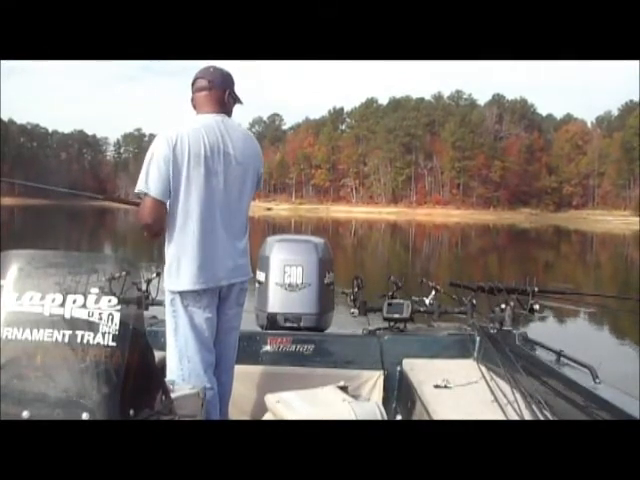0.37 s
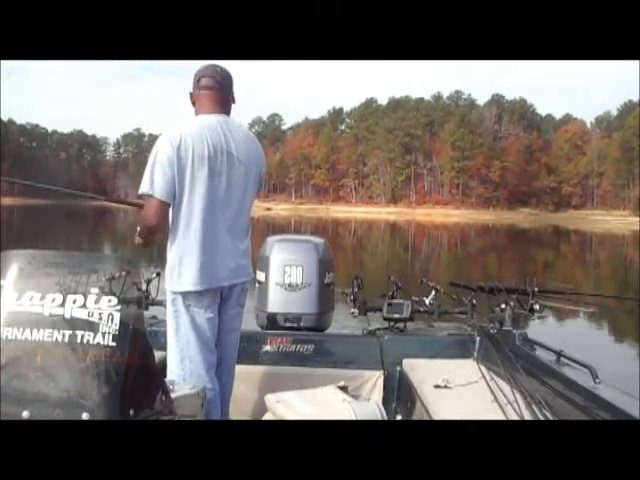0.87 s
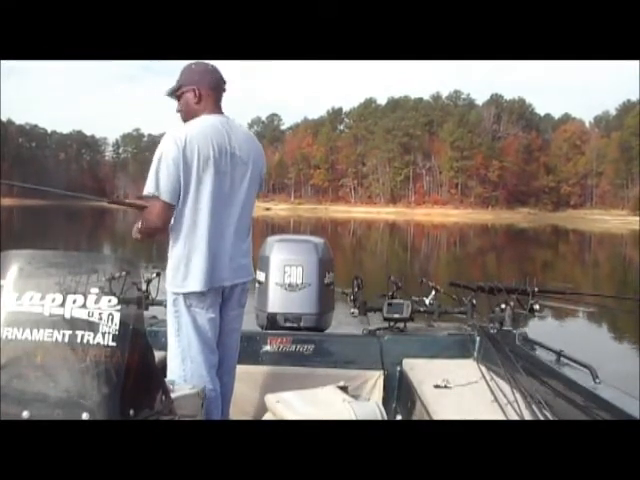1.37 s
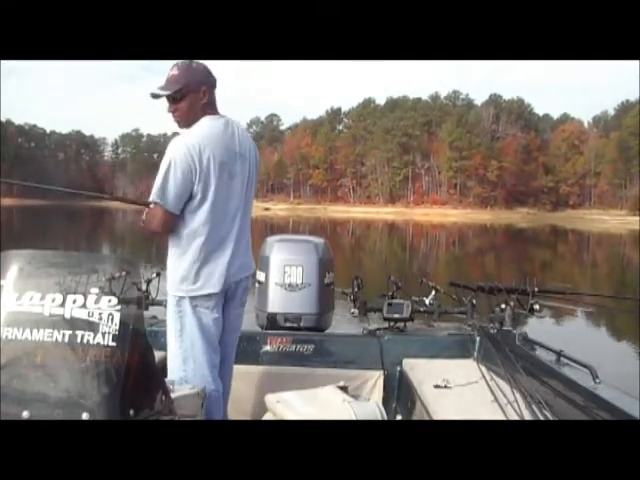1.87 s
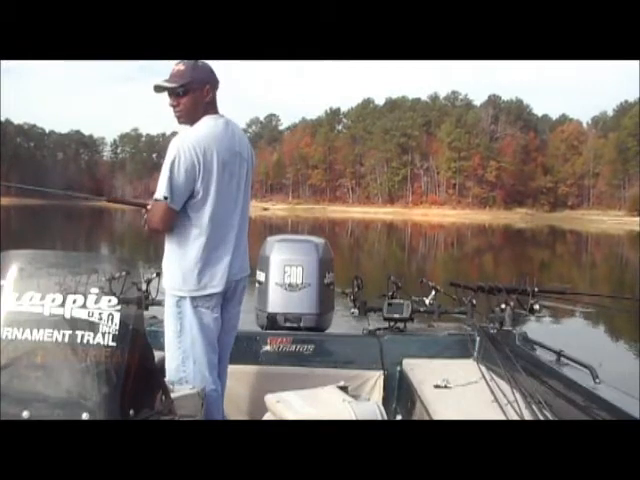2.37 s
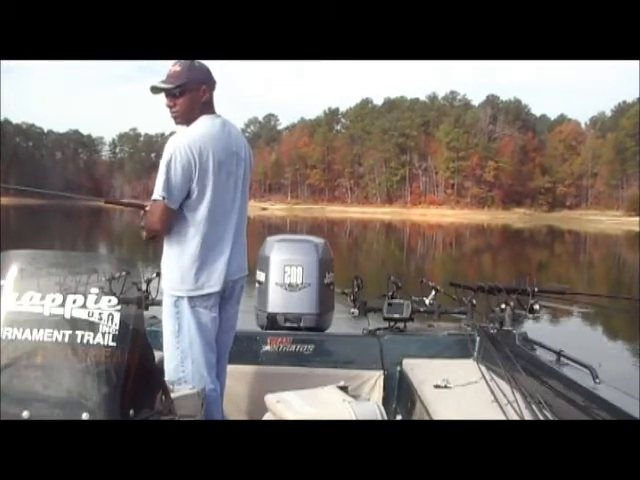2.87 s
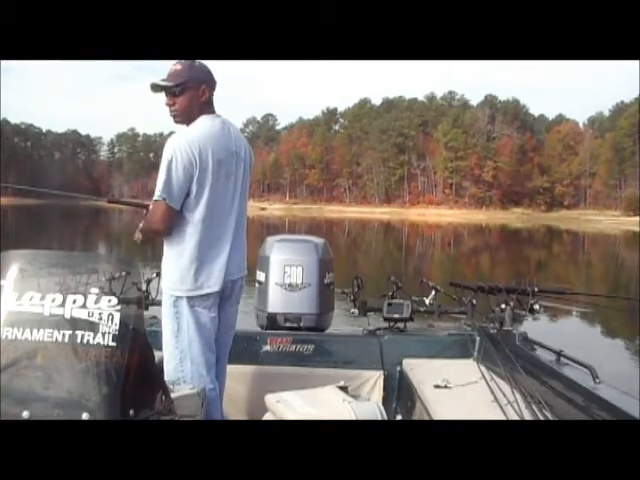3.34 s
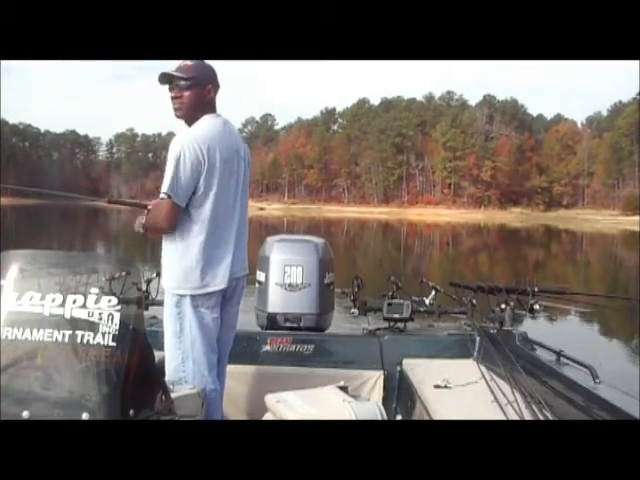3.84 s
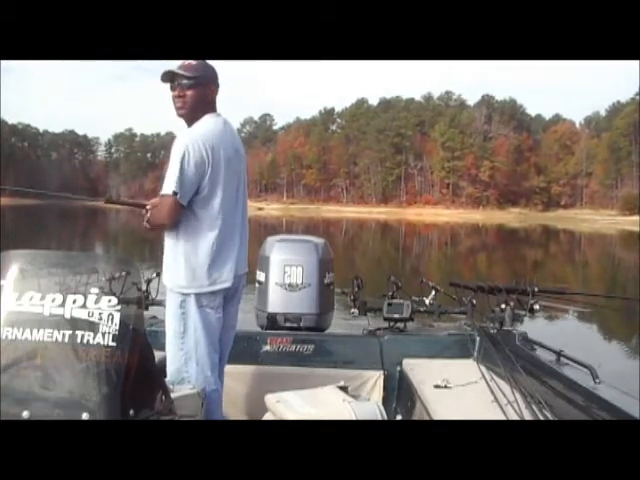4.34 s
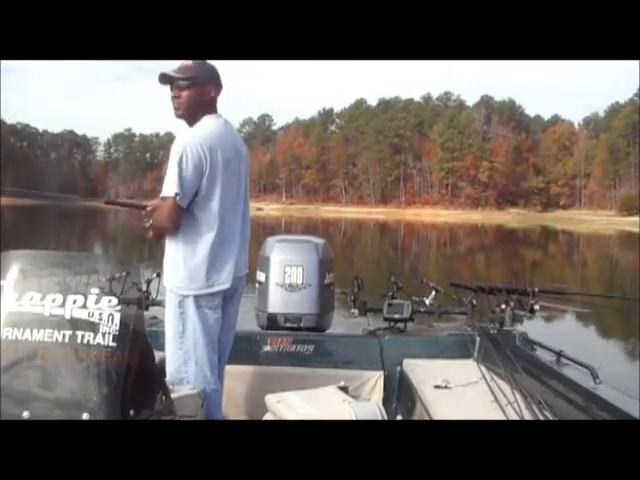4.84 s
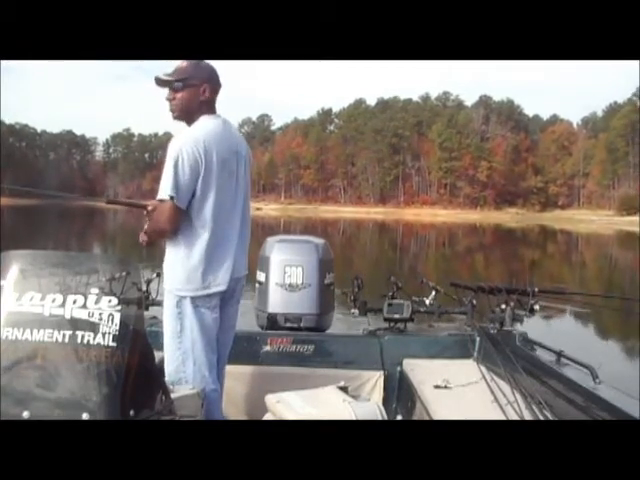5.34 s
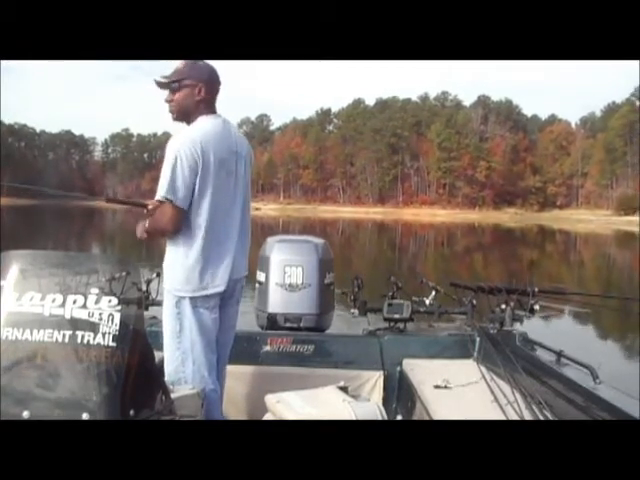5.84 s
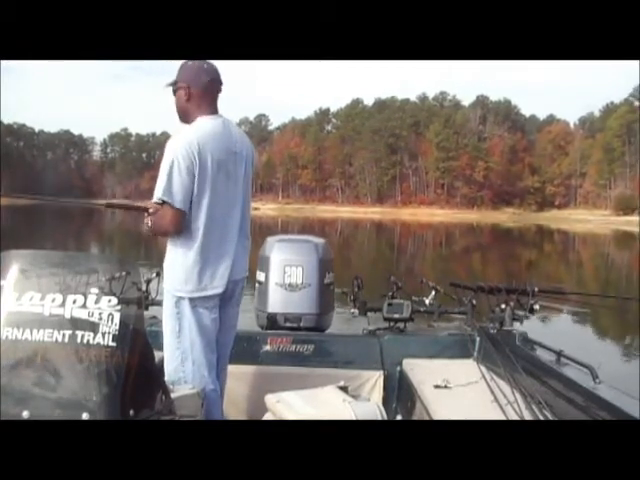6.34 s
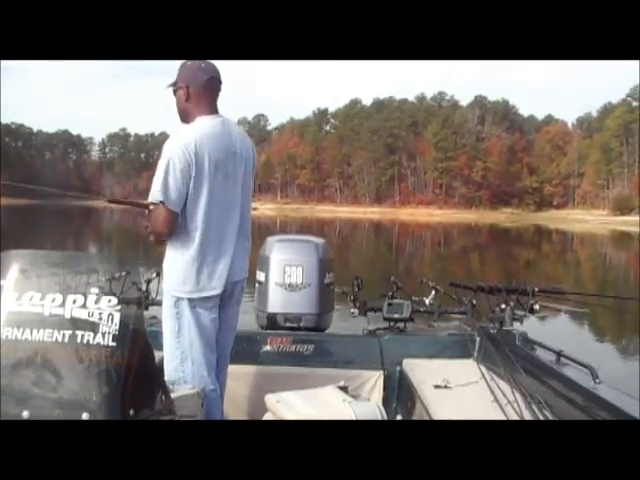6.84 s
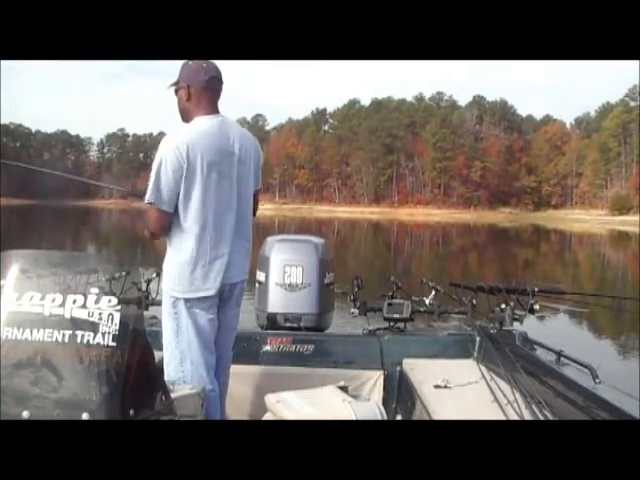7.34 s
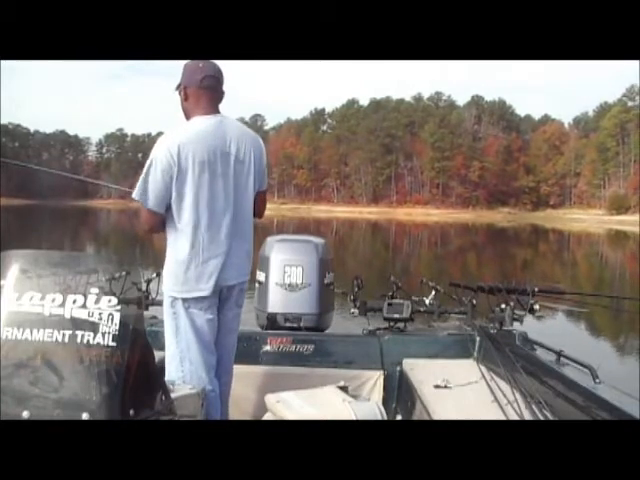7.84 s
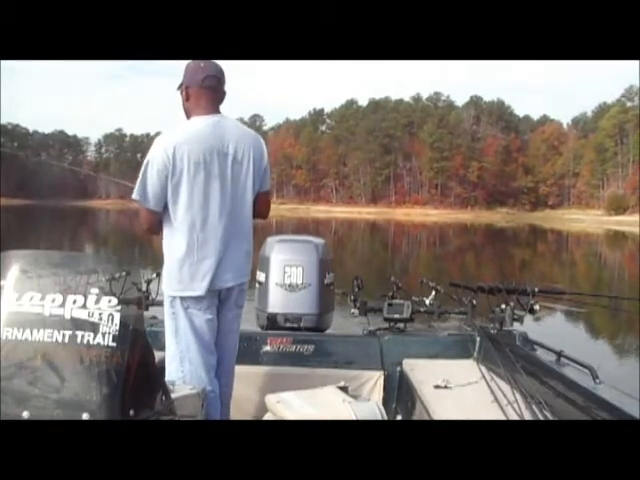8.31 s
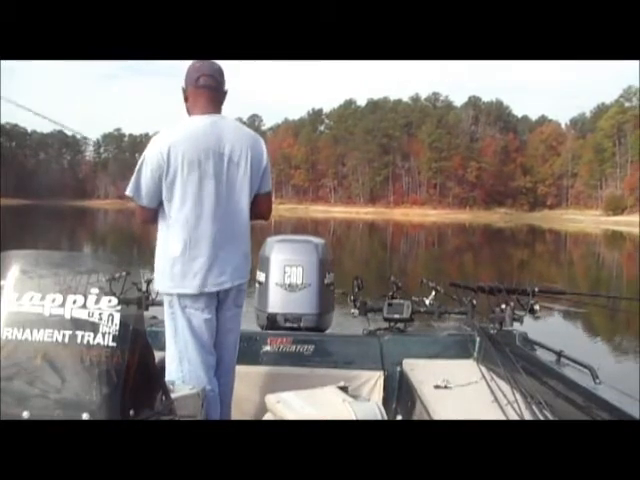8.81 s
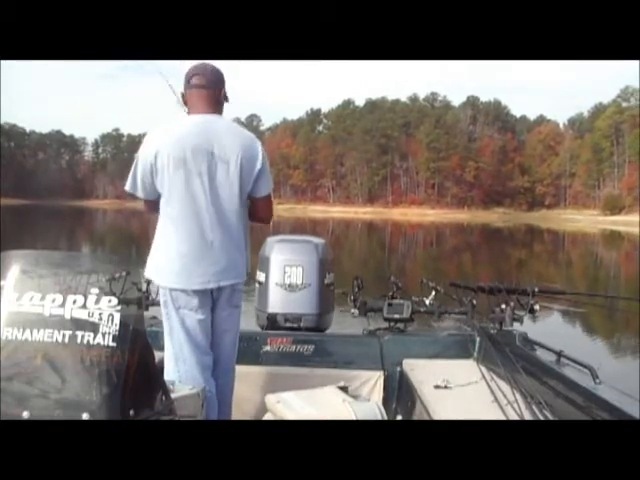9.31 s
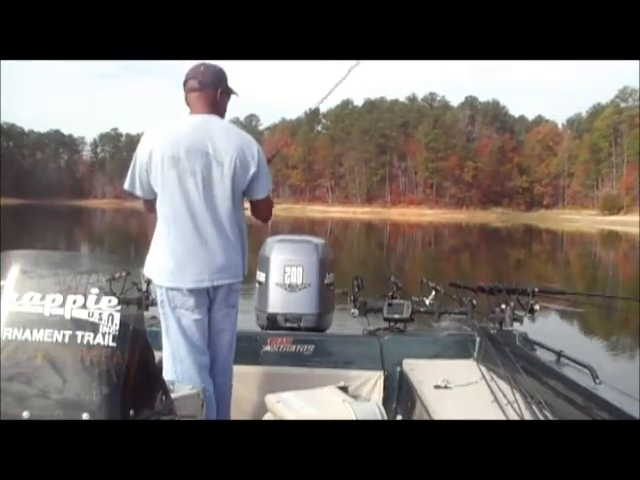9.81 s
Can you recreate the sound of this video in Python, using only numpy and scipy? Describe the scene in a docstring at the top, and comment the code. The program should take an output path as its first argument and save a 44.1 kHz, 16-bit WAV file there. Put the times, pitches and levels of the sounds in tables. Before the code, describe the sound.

Small reel gears whirr quietly for eight seconds, broken by loud hard clacks and line squeaks, with steady boat hum and distant evenly spaced caws.

```python
"""Cranked spinning reel on a moored boat

Gear noise swells with each rotor turn until cranking stops; noise blows ring the reel as the spool clacks at
the end of its stroke, parts tick and a last soft scrape rattles; swept harmonic tones make the line squeak.
Steady sines make the hull's pump motor hum, with two sidebands, and two high electronic whines; pulsed noise
is a faint insect, patchy noise the rumble and air. A hoarse harmonic voice is a far crow, echoed by the
wooded shore; a sliding sine is a small bird."""
import sys
import numpy as np
from scipy import signal
from scipy.fft import rfft, irfft, next_fast_len
from scipy.io import wavfile
from scipy.ndimage import uniform_filter1d, map_coordinates

SR = 44100
rng = np.random.default_rng(int(sys.argv[2]) if len(sys.argv) > 2 else 0)


def undo_db(level):
    """Turn decibels back into plain size, where 20 dB means ten times bigger."""
    steps = np.asarray(level, float) / 20
    return 10 ** steps


def transcribe(u):
    """Save the signal u as a 16-bit wav file named by the first command-line argument.

    u: samples, shape (n,) or (channels, n), limited to [-1, 1]; the rate is SR.
    q: integer samples, one column per channel.
    """
    v = np.clip(np.atleast_2d(u).T, -1, 1)
    q = np.round(v * 32767).astype(np.int16)
    wavfile.write(sys.argv[1], SR, q)


N = 438354
T = np.arange(N) / SR


def unit(x):
    """Scaled to rms 1."""
    return x / np.sqrt(np.mean(x ** 2) + 1e-20)


def along(points, hz):
    """Interpolates (hz, value) points on a log frequency axis."""
    point_hz, value = np.transpose(points)
    return np.interp(np.log(hz + 1), np.log(point_hz + 1), value)


def wobble(rate_hz):
    """Smooth random curve with rate_hz knots a second."""
    knots = rng.standard_normal(int(N * rate_hz / SR) + 4)
    return map_coordinates(knots, [T * rate_hz])


def filtered(x, response):
    """x times a complex response of frequency."""
    size = next_fast_len(x.shape[-1] + 8192)
    spectrum = rfft(x, size) * response(np.fft.rfftfreq(size, 1 / SR))
    return irfft(spectrum, size)[..., :x.shape[-1]]


def resonance(f, hz, width_hz):
    """One causal resonance of gain 1."""
    return 1j * f * width_hz / (hz * hz - f * f + 1j * f * width_hz)


def modes(f, table):
    """Causal sum of (hz, width_hz, gain_db) resonances with alternating signs."""
    return sum((-1) ** k * undo_db(db) * resonance(f, hz, width_hz) for k, (hz, width_hz, db) in enumerate(table))


def ports(x, lead_s):
    """Stereo pair of a sound from one side: the left microphone leads by lead_s."""
    side = np.array([[1], [-1]])
    return filtered(x, lambda f: np.exp(1j * np.pi * f * lead_s * side))


def rush(gain, alike, patchy_db):
    """Stereo noise of rms 1 with time-frequency patches of random gain."""
    z = signal.stft(rng.standard_normal((2, N)), nperseg=256)[2]
    field = uniform_filter1d(rng.standard_normal(z.shape[1:]), size=3, axis=0)
    field = uniform_filter1d(field, size=5, axis=1)
    pair = signal.istft(z * undo_db(patchy_db * unit(field)), nperseg=256)[1][:, :N]

    def mid_side_gain(f):
        turn = np.arccos(np.clip(along(alike, f), -1, 1)) / 2
        return gain(f) * np.array([np.cos(turn), np.sin(turn)])

    mid, side = filtered(pair, mid_side_gain)
    return unit(np.array([mid + side, mid - side]))


def echo(x, t60s, length_s):
    """Diffuse stereo tail; each frequency decays at its own speed."""
    hz, t, z = signal.stft(rng.standard_normal((2, round(length_s * SR))), SR, nperseg=128)
    decay = undo_db(-60 * t / along(t60s, hz)[:, None])
    tail = signal.istft(z * decay, SR, nperseg=128)[1]
    return signal.fftconvolve(x[None], tail / np.linalg.norm(tail[0]), axes=1)


def add(out, start_s, x):
    """Mixes x into out from start_s on."""
    part = out[..., round(start_s * SR):][..., :x.shape[-1]]
    part += x[..., :part.shape[-1]]


# reel body resonances: (pitch_hz, width_hz, gain_db)
REEL_BODY = [(2253, 630, -1), (3440, 1770, -2), (4500, 1580, -3.5), (6420, 1200, -7.5), (8060, 2900, -10.5),
             (10230, 1800, -7), (12300, 1200, -5), (14280, 500, -14)]


def body(f):
    """The reel's resonances; so small a thing radiates no bass."""
    return modes(f, REEL_BODY) * (1j * f / (1200 + 1j * f)) ** 2


# gear wheel ringing: (pitch_hz, relative_level_db)
GEAR_MODES = [(2580, -16), (3490, -2), (4400, -9), (6650, -0.5), (7600, -3), (10700, 1), (12400, -7)]


def pings(load_db, count):
    """Single teeth catch, louder under load, and each briefly rings one gear mode."""
    luck, t = rng.random((count, 4)), np.arange(SR // 40) / SR
    hz, db = np.array(GEAR_MODES)[(luck[:, 0] * len(GEAR_MODES)).astype(int)].T
    at = (luck[:, 1] * N).astype(int)
    size = undo_db(db + 1.1 * load_db[at] - 1.8 * np.log(luck[:, 2]))
    detuned_hz = hz * (1 + 0.075 * (luck[:, 3] - .5))
    ring = np.sin(2 * np.pi * detuned_hz[:, None] * t)
    ring *= undo_db(-60 * t * hz[:, None] / 130)  # 60 dB in 130 cycles
    ring *= 1 - np.exp(-t / 0.00024)
    samples = at[:, None] + np.arange(len(t))
    out = np.bincount(samples.ravel(), (size[:, None] * ring).ravel())
    return unit(out[:N])


# rotor, speeding up and slowing with the hand: (time_s, turns_made)
ROTOR_TURNS = [(0.0, 0.5), (1.2, 22.29), (1.6, 29.8), (2.6, 47.99), (3.0, 55.7), (3.4, 63.59), (3.8, 71.07),
               (4.4, 81.92), (4.6, 85.37), (5.6, 103.7), (6.2, 114.99), (6.6, 122.11), (6.8, 125.2),
               (7.4, 135.7), (8.4, 152.61)]
# gear whirr, easing off until the hand stops: (time_s, level_db)
WHIRR_LEVEL = [(0.0, -54), (1.3, -52.5), (2.1, -54), (2.6, -53), (5.5, -54), (6.0, -52.5), (6.8, -55.5),
               (8.04, -56), (8.23, -61.5), (8.3, -87)]


def gears():
    """The mesh grinds hardest at one spot of each rotor turn and a little at the opposite one."""
    angle = 2 * np.pi * np.interp(T, *np.transpose(ROTOR_TURNS))
    load_db = (1.35 + .5 * wobble(6.46)) * np.cos(angle)
    load_db += (1.5 + .5 * wobble(6.7)) * np.cos(2 * angle)
    load_db += 0.82 * wobble(30)

    def grind_gain(f):
        tilt = undo_db(0.36 * np.log2(f / 4000 + .01))
        return abs(body(f)) * tilt / (1 + (f / 15100) ** 90)

    alike = [(2500, 1.0), (7000, 0.82), (14000, 0.6)]  # (hz, left-right likeness)
    grind = rush(grind_gain, alike, patchy_db=3.0)
    teeth = ports(pings(load_db, count=1500), 6e-6)
    time_s, level_db = np.transpose(WHIRR_LEVEL)
    level = undo_db(np.interp(T, time_s, level_db, right=-120))
    return level * unit(undo_db(load_db) * grind + undo_db(-5.5) * teeth)


# pump motor tones: (pitch_hz, level_db, waver_db)
PUMP_TONES = [(33.5, -86, 1), (86.4, -66.5, 3), (171.4, -55, 1.5), (263.7, -70.5, 3), (293, -69.5, 2.5),
              (346.4, -69, -1.5), (839, -58.5, .5), (1208, -78.5, 5)]


def pump():
    """Motor tones wavering slightly in level and phase, a little out of step at the two microphones."""
    out = np.zeros((2, N))
    for hz, level_db, waver_db in PUMP_TONES:
        level = undo_db(level_db + waver_db * wobble(25))
        phase = 2 * np.pi * hz * T + 0.22 * waver_db * wobble(8) + [[.3], [-.3]]
        out += np.sqrt(2) * level * np.sin(phase)
    return out


# two sidebands of the 839 Hz motor tone, then two high electronic whines: pitch_hz
THIN_TONES_HZ = [769, 909, 6659, 9076]


def thin_tones():
    """Thin steady tones: two sidebands of the 839 Hz motor tone, two high electronic whines."""
    levels_db = [-79.5, -75.5, -84, -84.5]
    return np.sqrt(2) * sum(undo_db(db) * np.sin(2 * np.pi * hz * T) for hz, db in zip(THIN_TONES_HZ, levels_db))


def insect():
    """A band of buzz pulsed about sixty times a second, unevenly, strongest at its lower edge."""
    at = np.arange(0, N, SR / 60.3).astype(int)
    clicks = np.zeros(N)
    clicks[at] = undo_db(3 * rng.standard_normal(len(at)) + 1.1 * wobble(3.5)[at])
    pulses = 0.24 + signal.fftconvolve(clicks, np.hanning(160))[:N]
    bursts = pulses * rng.standard_normal((2, N))
    bursts += 0.71 * bursts.mean(axis=0)

    def band(f):
        return (1 + 2.0 * abs(resonance(f, 5300, 250))) / (1 + ((f - 5950) / 900) ** 8)

    return undo_db(-68.0) * unit(filtered(bursts, band))


# hull rumble and far air: (pitch_hz, relative_density_db_per_hz)
AIR_SPECTRUM = [(15, -51), (30, -7), (48, -15.5), (70, -3), (120, -7), (217, -8.5), (363, -7.5), (714, -15),
                (988, -18), (1520, -19.5), (2600, -23), (4740, -29.5), (7310, -31.5), (10500, -35),
                (13000, -42), (15200, -41), (15300, -90)]
# the same: (pitch_hz, left_right_likeness)
AIR_ALIKE = [(60, 0.79), (150, 0.89), (300, 0.41), (700, 0.29), (1400, 0.32), (5000, 0.16)]


def rumble_and_air():
    """Hull rumble and far air as one shaped, patchy stereo noise."""
    return undo_db(-54.5) * rush(lambda f: undo_db(along(AIR_SPECTRUM, f)), AIR_ALIKE, patchy_db=1.0)


# deck answer: (pitch_hz, t60_s)
DECK_T60 = [(1000, 0.38), (3000, 0.24), (12000, 0.013)]


def deck(x, length_s):
    """The deck answers with a short diffuse tail, cut to the length of x."""
    return echo(x, DECK_T60, length_s)[:, :len(x)]


# short line squeaks: (start_s, length_s, first_pitch_hz, last_pitch_hz, level_db)
SHORT_SQUEAKS = [(0.4044, .013, 4960, 5850, -31.5), (.6765, .018, 5600, 5100, -36),
                 (1.264, .009, 5730, 5860, -41), (7.2705, 0.011, 5150, 4550, -45)]
# one long squeal of the line: (time_s, pitch_hz, level_db)
LONG_SQUEAL = [(6.931, 5300, -50.5), (6.935, 4350, -30), (6.944, 4320, -38.5), (6.947, 4600, -33),
               (6.957, 5020, -35), (6.97, 4780, -34), (6.986, 4670, -40), (6.99, 4580, -34),
               (6.996, 4730, -42), (7.004, 4500, -40), (7.022, 4550, -58)]
SLIP_SHARE, FADE_DB = 0.55, 18  # share of a short squeak at full strength, fall over the rest
OCTAVE_DB, FLUTTER_DB = -11.5, 1.6


def squeaks():
    """Stick-slip of the line: a rough, fluttering tone with its octave and twelfth."""
    out = np.zeros((2, N))
    curves = []
    for start_s, length_s, first_hz, last_hz, db in SHORT_SQUEAKS:
        slip_end = (start_s + SLIP_SHARE * length_s, last_hz, db)
        curves.append([(start_s, first_hz, db), slip_end, (start_s + length_s, last_hz, db - FADE_DB)])
    for rows in curves + [LONG_SQUEAL]:
        time_s, pitch_hz, level_db = np.transpose(rows)
        t = np.arange(time_s[0], time_s[-1], 1 / SR)
        hz, db = np.interp(t, time_s, pitch_hz), np.interp(t, time_s, level_db)
        rough_hz = hz * (1 + 0.014 * wobble(920)[:len(t)])
        phase = 2 * np.pi * np.cumsum(rough_hz) / SR
        overtones = np.sin(2 * phase) + undo_db(-10.5) * np.sin(3 * phase)
        tone = np.sin(phase) + undo_db(OCTAVE_DB + 3 * wobble(180)[:len(t)]) * overtones
        level = undo_db(db + FLUTTER_DB * wobble(260)[:len(t)])
        x = np.sqrt(2) * tone * level * signal.windows.tukey(len(t), .15)
        add(out, time_s[0], x * undo_db([[-1.5], [1.5]]) + undo_db(-6.5) * deck(x, 0.087))
    return out


# spool and rod handle under a blow: (pitch_hz, width_hz, gain_db)
KNOCK_MODES = [(670, 68, -14.5), (908, 41, -11), (1280, 160, -12.5), (1533, 74, -15.5), (2500, 79, -4.5),
               (2718, 42, 7), (2870, 110, -1.5)]
# spool clacks at the end of its stroke; the last row is a soft, rattling scrape:
# (start_s, peak_db, rattle_db)
CLACKS_AND_SCRAPE = [(.9146, -11.5, -10.5), (2.599, -9, -8), (4.241, -12, 1), (5.9382, -12, -1.5),
                     (7.417, -13.5, -5), (7.7051, -17, 2), (8.192, -31.5, 14)]
CLACK_T60_S, CLACK_BRIGHT_DB_PER_OCTAVE = 0.056, 7
# small ticks, with the spool's rebound one rotor turn after the first and third clacks (0.9654 s, 4.2944 s):
# (start_s, peak_db, rattle_db, bright_db_per_octave)
PART_TICKS = [(.442, -37, -10, 9), (0.507, -38, -18, 2), (.9654, -37, -4, 11), (4.2944, -37, -2, 7),
              (4.527, -39, 6, 10), (4.686, -39, -8, 17), (7.0738, -40, -18, 16), (7.1324, -30, -12, 19),
              (7.194, -37, -18, 18), (7.199, -25.5, -15, 19), (7.2408, -38, -18, 13),
              (7.2448, -28, -12, 26), (7.4833, -23, -22, 11.5), (7.638, -38, -6, 10), (8.02, -42, 4, -3),
              (8.05, -43, 4, -3), (8.094, -37, -8, 7), (8.3619, -52, -8, -5), (8.4935, -49, -6, 7),
              (9.3045, -40, 3, 9)]
TICK_T60_S = 0.055


def blows():
    """A sharp contact, a rebound, then a rattle, which outweighs the contact in the scrape; body and deck ring."""
    out, t = np.zeros((2, N)), np.arange(SR // 8) / SR
    rows = [(*clack, CLACK_BRIGHT_DB_PER_OCTAVE, CLACK_T60_S) for clack in CLACKS_AND_SCRAPE]
    rows += [(*tick, TICK_T60_S) for tick in PART_TICKS]
    for start_s, peak_db, rattle_db, bright_db, t60_s in rows:
        crack = undo_db(-60 * t / .005)
        rebound = 0.93 * np.exp(-((t - .008) / 0.002) ** 2)
        rattle = undo_db(rattle_db - 60 * t / t60_s) * (1 + rebound)

        def ringing(f):
            tilt = ((1 + 1j * f / 3000) / (1 + 1j * f / 11000)) ** (bright_db / 6)
            return (body(f) + modes(f, KNOCK_MODES)) * tilt / (1 + 1j * f / 12000) ** 2

        x = filtered((crack + rattle) * rng.standard_normal(len(t)), ringing)
        loudest_rms = np.sqrt(uniform_filter1d(x ** 2, size=100).max())
        x *= undo_db(peak_db) / (2.8 * loudest_rms)  # the peak stands well over the loudest rms
        add(out, start_s, ports(x, 11e-6) + undo_db(-30) * deck(x, 0.046))
    return out


# caws: (start_s, length_s, top_pitch_hz, level_db, sink_at_top_db)
CROW_CAWS = [(5.28, 0.11, 778, -44, 5.5), (5.998, 0.12, 745, -46.5, 1), (6.683, 0.13, 754, -46, 0.5),
             (7.414, 0.12, 760, -47, 2), (8.149, .112, 767, -46.5, 6), (8.866, 0.12, 764, -46, 4),
             (9.589, 0.12, 765, -44.5, 9)]
# pitch arch of one caw: (length_share, pitch_over_top_pitch)
CAW_ARCH = [(0, .8), (.1, .83), (.22, .94), (.33, .99), (.5, 1.0), (.7, .945), (.85, .875), (1, .82)]
# caw harmonics: (harmonic, relative_level_db)
CROW_HARMONICS = [(1, -26), (2, 0), (3, -21), (4, -34), (5, -26)]
# shore echo: (pitch_hz, t60_s)
SHORE_T60 = [(700, 0.5), (1250, 0.16), (1520, 1.73), (2200, 0.67), (4000, 0.34)]
BEAK_HZ, BEAK_WIDTH_HZ = 1465, 220  # the second harmonic crosses it going up and coming down
HOARSE_DB = .6  # level shake of a harmonic, times its number
PUSH_DB = 65  # the other harmonics lose this times the share by which the pitch is under its top


def crow():
    """An arched, hoarse caw carried by its second harmonic; the shore echoes it a little later."""
    out = np.zeros((2, N))
    for start_s, length_s, top_hz, level_db, sink_db in CROW_CAWS:
        u = np.linspace(0, 1, round(length_s * SR))
        n = len(u)
        hz = top_hz * np.interp(u, *np.transpose(CAW_ARCH))
        phase = 2 * np.pi * np.cumsum(hz * (1 + 0.019 * wobble(147)[:n])) / SR
        sink = undo_db(-sink_db * np.exp(-((u - .5) / 0.16) ** 2))
        beak = abs(resonance(2 * hz, BEAK_HZ, BEAK_WIDTH_HZ)) * sink
        push = undo_db(-PUSH_DB * (1 - hz / top_hz))
        voice = np.zeros(n)
        for k, harmonic_db in CROW_HARMONICS:
            shaken = undo_db(harmonic_db + k * HOARSE_DB * wobble(81)[:n])
            voice += shaken * np.sin(k * phase) * (beak if k == 2 else push)
        level = undo_db(level_db + 1.7 * wobble(106)[:n])
        x = np.sqrt(2) * voice * level * signal.windows.tukey(n, .3)
        add(out, start_s, x * undo_db([[-1.2], [1.2]]))
        shore = echo(x, SHORE_T60, .9)
        shore = shore + 2.35 * shore.mean(axis=0)  # mostly from one bank
        add(out, start_s + 0.026, undo_db(-16) * shore)
    return out


# far small bird: (start_s, length_s, first_pitch_hz, last_pitch_hz, level_db)
BIRD_WHISTLES = [(9.135, .17, 4380, 4500, -75), (9.871, .07, 4400, 4600, -76)]


def bird():
    """A faint wavering whistle that slides upward."""
    out = np.zeros(N)
    for start_s, length_s, first_hz, last_hz, level_db in BIRD_WHISTLES:
        n = round(length_s * SR)
        hz = np.linspace(first_hz, last_hz, n) + 15 * wobble(80)[:n]
        tone = np.sin(2 * np.pi * np.cumsum(hz) / SR)
        level = undo_db(level_db + 4 * wobble(70)[:n])
        add(out, start_s, np.sqrt(2) * level * tone * signal.windows.tukey(n, .4))
    return out


def scene():
    """All sources over the rumble and air."""
    steady = gears() + pump() + thin_tones() + insect() + rumble_and_air()
    return steady + squeaks() + blows() + crow() + bird()


def low_pass(x):
    """Removes everything above the highest recorded frequency."""
    return signal.sosfilt(signal.butter(12, 16480, fs=SR, output="sos"), x)


def record(dry):
    """The very top is cut off steeply."""
    mix = filtered(dry, lambda f: 1 / (1 + (f / 16200) ** 40))
    return low_pass(mix)


dry = scene()
out = record(dry)
transcribe(out)
```